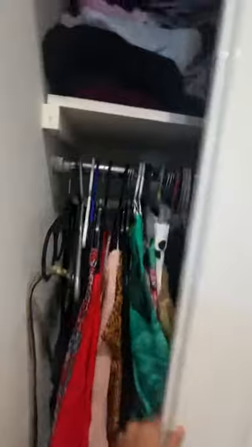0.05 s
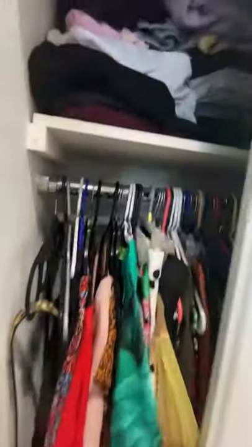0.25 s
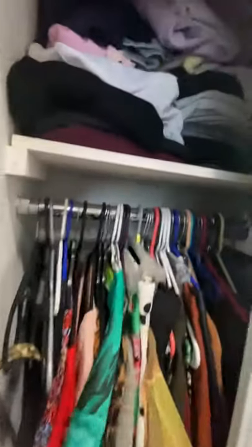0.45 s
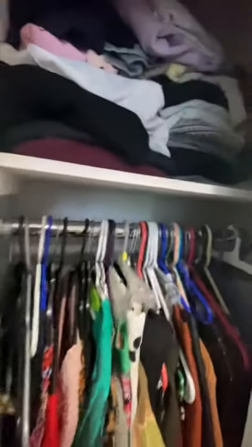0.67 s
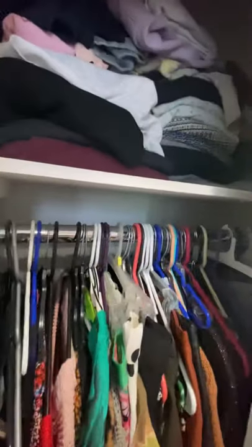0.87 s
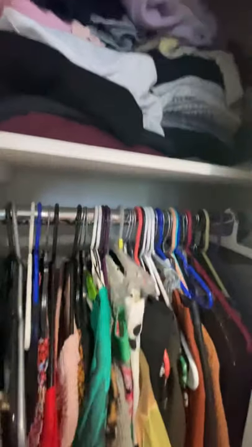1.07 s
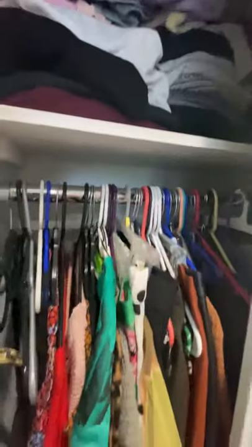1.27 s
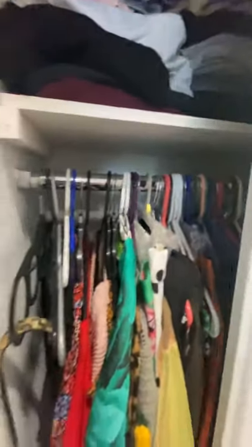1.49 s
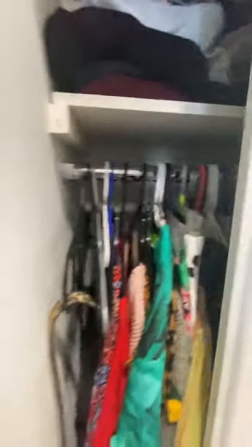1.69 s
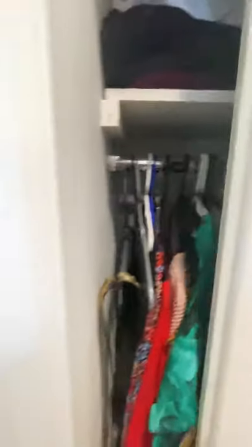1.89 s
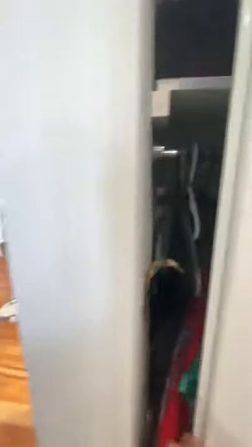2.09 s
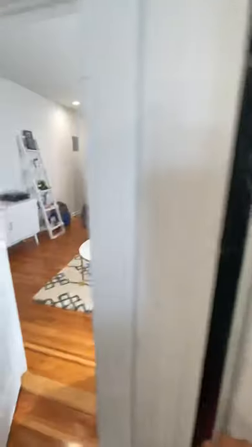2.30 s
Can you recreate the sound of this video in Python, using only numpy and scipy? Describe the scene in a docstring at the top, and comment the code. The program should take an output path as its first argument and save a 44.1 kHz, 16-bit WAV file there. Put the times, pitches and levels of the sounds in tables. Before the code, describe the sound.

Close up in a small, quiet room, a closet door knocks and chatters open by hand. After a brief lull with light plastic taps, it is pulled shut, rolling unevenly and bumping against its frame.

```python
"""A soft wooden knock and a low rub, close to a microphone pair in a small room: a light closet door
is pushed open and pulled shut by hand. It rolls unevenly, and its guide sticks and slips, chattering
along the metal track. Each knock against the frame cracks, rings the wood and track, and sets the
panel booming. Midway come a few light plastic taps, as of hangers; quiet room air lies under it all."""
import sys
import numpy as np
from scipy import signal
from scipy.fft import rfft, irfft, next_fast_len
from scipy.io import wavfile
from scipy.ndimage import uniform_filter1d

SR = 44100
rng = np.random.default_rng(int(sys.argv[2]) if len(sys.argv) > 2 else 0)


def materialize(psi):
    """Save the field psi as 16-bit PCM at rate SR to the path in sys.argv[1].

    A 1-D psi becomes a single channel; in a 2-D psi each row is a channel.
    """
    bounded = np.clip(np.atleast_2d(psi).T, -1, 1)
    quanta = np.round(bounded * 32767).astype(np.int16)
    wavfile.write(sys.argv[1], SR, quanta)


N = 108045


def amp(db):
    """Decibels to gain."""
    return 10 ** (np.asarray(db) / 20)


def unit(x):
    """Scales to rms 1."""
    return x / np.sqrt(np.mean(x ** 2) + 1e-20)


def fade(t, t60):
    """Falls 60 dB in t60 seconds."""
    return np.exp(-np.log(1000) * t / t60)


def curve_at(points, hz):
    """Interpolates a table on a log-frequency axis."""
    f, value = np.transpose(points)
    return np.interp(np.log(hz + 1), np.log(f + 1), value)


def add(mix, start, sound):
    """Mixes a sound in, start seconds from the beginning."""
    part = mix[:, max(round(start * SR), 0):][:, :sound.shape[1]]
    part += sound[:, :part.shape[1]]


def noise(spectrum, size, tilt=0):
    """Two unrelated noises of one spectrum at rms 1, tilted in dB per octave above about 1 kHz."""
    hz = np.fft.rfftfreq(size, 1 / SR)
    phase = np.exp(2j * np.pi * rng.random((2, len(hz))))
    db = curve_at(spectrum, hz) + tilt * np.log2(1 + hz / 1000)
    return unit(irfft(phase * amp(db), size))


def ring(modes, t, pitch=1):
    """Dying sines, slightly detuned at random, heard at two spots a quarter cycle apart."""
    detune = 1 + 0.003 * rng.standard_normal(len(modes))
    z = sum(amp(db) * fade(t, t60) * np.exp(2j * np.pi * hz * pitch * d * t)
            for (hz, db, t60), d in zip(modes, detune))
    return np.array([z.imag, z.real])


# The still room at the microphones. Each row: frequency in Hz, relative noise density in dB.
AIR_SPECTRUM = [(15, -12), (50, 6), (100, -17), (300, 1), (600, -18), (1200, -52), (2000, -18), (3200, -55),
                (4800, -27), (8000, -47), (12000, -37), (16000, -57)]

def room_air():
    """A steady, quiet rush of air in the background."""
    return amp(-61) * noise(AIR_SPECTRUM, N)


# The small room's decay. Each row: frequency in Hz, t60 in seconds.
ROOM_DECAY = [(60, 0.88), (250, 0.15), (700, 0.42), (2000, 0.48), (5000, 0.47), (12000, 0.27)]

def room(x, db):
    """The walls add a tail of sparse reflections, each band dying at its own speed."""
    echoes = rng.standard_normal((2, SR)) * (rng.random((2, SR)) < 4000 / SR)
    hz, t, z = signal.stft(echoes, SR, nperseg=256)
    tail = signal.istft(z * fade(t, curve_at(ROOM_DECAY, hz)[:, None]), SR, nperseg=256)[1]
    tail *= np.arange(tail.shape[1]) > 0.0064 * SR  # reflections begin after 6.4 ms
    return x + amp(db) * signal.fftconvolve(x, tail / np.linalg.norm(tail[0]), axes=1)[:, :N]


# The close pair. Each row: frequency in Hz, then in turn the left-right likeness from 0 to 1,
# the left's phase lead in radians, and left minus right in dB.
MIC_LIKENESS = [(100, .997), (200, .98), (380, .93), (560, .55), (750, .4), (1100, .65), (1600, .75),
                (3200, .62), (6000, .68), (7200, .92), (8600, .72), (10000, .98), (15000, .92)]
MIC_LEAD = [(100, 0), (380, -.15), (520, -.6), (680, -1.3), (820, -1.9), (950, -3.3), (1120, -5),
            (1800, -6), (2600, -4.4), (3900, -5.5), (6000, -5.6), (7000, -3.3), (7800, -3), (9700, -.1),
            (11500, .1), (12600, 3), (14500, 3.2), (15500, 6.1)]
MIC_BALANCE = [(50, 1.5), (170, -3), (330, -4), (550, -1.5), (800, 1), (1150, -0.5), (1900, 1.5),
               (2700, -1.5), (5500, -0.5), (9000, -0.5)]

def mic_pair(x):
    """The two microphones hear a sound partly alike, shifted in phase and a little unequal."""
    size = next_fast_len(x.shape[1] + SR // 4)
    shared, apart = rfft(x, size)
    hz = np.fft.rfftfreq(size, 1 / SR)
    alike = np.clip(curve_at(MIC_LIKENESS, hz), 0, 1)
    side = amp(curve_at(MIC_BALANCE, hz) / 2)
    left = (alike * shared + np.sqrt(1 - alike ** 2) * apart) * np.exp(1j * curve_at(MIC_LEAD, hz))
    return irfft(np.array([left * side, shared / side]), size)[:, :x.shape[1]]


def patchy(x, depth_db=2, patch_s=0.07, patch_hz=350):
    """Narrow bands swell and sink at random as the rubbing spot changes."""
    hz, t, z = signal.stft(x, SR, nperseg=512)
    swell = uniform_filter1d(rng.standard_normal(z.shape[1:]), round(patch_s / t[1]), axis=1)
    swell = unit(uniform_filter1d(swell, round(patch_hz / hz[1]), axis=0))
    return unit(signal.istft(z * amp(depth_db * swell), SR, nperseg=512)[1][:, :x.shape[1]])


# The door moving by the microphones. Each row: time in seconds, then rub, roll and rumble in dB.
TRAVEL_LEVELS = [(0, -50.5, -44, -40), (0.102, -57.5, -47, -46), (.2, -47, -43, -44.5),
                 (.42, -66, -37.5, -31), (.55, -58.5, -53.5, -39), (.68, -62, -56, -44.5),
                 (0.802, -64.5, -61.5, -47.5), (.86, -71.5, -52.5, -46.5), (.92, -76.5, -56.5, -52.5),
                 (1.06, -65, -53, -46), (1.16, -57.5, -57.5, -52.5), (1.3, -56.5, -54, -47),
                 (1.44, -58.5, -49.5, -49), (1.6, -60.5, -48.5, -35), (1.73, -56, -44.5, -45),
                 (1.88, -59.5, -48.5, -51), (2.0, -54, -40.5, -39.5), (2.2, -59.5, -45, -36.5),
                 (2.359, -59, -61, -43.5), (2.45, -59.5, -46, -43)]
# Those three noises. Each row: frequency in Hz, relative density in dB.
RUB_SPECTRUM = [(100, 1), (700, 10.5), (1200, -6), (1700, 4), (2800, 4), (3800, -3), (5300, 0.5),
                (7500, -5.5), (12000, -13.5), (13000, -10), (16000, -31)]
ROLL_SPECTRUM = [(25, 5.5), (70, -6), (120, 2.5), (200, -3.5), (420, -9.5), (650, -18.5), (1100, -18.5),
                 (3000, -81), (9000, -101)]
RUMBLE_SPECTRUM = [(15, -31), (30, 3), (42, 3.5), (50, 7.5), (62, 4), (85, -11.5), (150, -27), (500, -95)]
# The metal track, rubbed or knocked. Each row: Hz before pitch scaling, level in dB, t60 in seconds.
TRACK_MODES = [(1560, -35, 0.11), (1680, -18.5, 0.1), (2070, -30, 0.11), (2120, -30, 0.13),
               (2286, -23.5, 0.22), (2778, -26.5, 0.255), (3027, -20.5, 0.16), (4333, -23.5, 0.15),
               (5430, -31, 0.11), (5620, -24, 0.17)]

def travel():
    """The moving door rubs along the ringing track, rolls unevenly and shakes its panel."""
    times, *levels = np.transpose(TRAVEL_LEVELS)
    rub_db, roll_db, rumble_db = [np.interp(np.arange(N) / SR, times, db) for db in levels]
    flutter_db = 2 * unit(uniform_filter1d(rng.standard_normal(N), size=700))
    t = np.arange(SR // 4) / SR
    friction = noise(RUB_SPECTRUM, N)
    damped_track = ring(TRACK_MODES, t, pitch=0.91) * fade(t, t60=0.59)
    singing = unit(signal.fftconvolve(friction, damped_track, axes=1)[:, :N])
    rub = amp(rub_db + flutter_db / 2) * patchy(friction + amp(-9.5) * singing)
    roll = amp(roll_db + flutter_db) * noise(ROLL_SPECTRUM, N)
    return rub + roll + amp(rumble_db) * noise(RUMBLE_SPECTRUM, N)


# Light taps at the closet. Each row: start in seconds, then click, body and edge gains in dB.
PLASTIC_TAPS = [(0.569, -53.5, -70, -50), (0.9835, -41, -43, -45.5), (0.995, -56, -43, -70),
                (1.047, -55.5, -59, -66)]
# Those three parts as noise. Each row: frequency in Hz, relative density in dB.
CLICK_SPECTRUM = [(250, -35), (600, 3.5), (1500, -4), (2100, 3), (2900, 0), (3800, -14.5), (6500, -16.5),
                  (13000, -44)]
BODY_SPECTRUM = [(150, -31), (330, -13), (420, 1), (620, -7), (760, -4.5), (1050, -8.5), (1600, -52),
                 (3500, -27), (9000, -49)]
EDGE_SPECTRUM = [(2000, -20), (6000, -17), (7300, 3), (8500, 0.5), (10300, -6), (12000, -19.5),
                 (15000, -21.5)]
# The body's ring. Each row: frequency in Hz, level in dB, t60 in seconds.
PLASTIC_MODES = [(350, -8.5, 0.17), (415, 1.5, 0.18), (592, -6.5, 0.28), (910, -4, 0.28), (1078, 1, 0.21),
                 (1443, -4.5, 0.14), (2060, -3.5, 0.087), (2760, -12, 0.067), (3190, -18, .1)]
CONTACT_RISE_S = 0.00093

def plastic_taps():
    """Tapped plastic gives a dry click, a thin bright edge and a hollow body that dies more slowly."""
    t, out = np.arange(SR // 2) / SR, np.zeros((2, N))
    for start, click_db, body_db, edge_db in PLASTIC_TAPS:
        click = amp(click_db) * noise(CLICK_SPECTRUM, len(t)) * fade(t, t60=0.09)
        hollow = amp(-2) * noise(BODY_SPECTRUM, len(t)) * fade(t, t60=0.23)
        body = amp(body_db) * (hollow + amp(-3) * ring(PLASTIC_MODES, t))
        edge = amp(edge_db) * noise(EDGE_SPECTRUM, len(t)) * fade(t, t60=0.048)
        add(out, start, (click + body + edge) * np.minimum(t / CONTACT_RISE_S, 1))
    return room(out, db=-13.5)


# The guide catching in the track, heard close. Each row: start and length in seconds, chatter in dB,
# its tilt in dB per octave, judder of the wood in dB.
GUIDE_SCRAPES = [(0.171, 0.066, -48, 4, -39.5), (0.269, 0.075, -38.5, 4.5, -60),
                 (1.507, 0.0955, -39, 0.5, -45.5), (1.763, 0.063, -41.5, 5, -46.5),
                 (2.21, 0.077, -62.5, 13, -56.5), (2.322, 0.07, -47, 3, -45)]
# The track's chatter and the wood's judder. Each row: frequency in Hz, relative density in dB.
CHATTER_SPECTRUM = [(60, 35.5), (400, 25), (900, -3), (1500, -6), (2400, 7), (3800, 1), (5600, 2.5),
                    (7500, -3.5), (11800, -12.5), (13000, -25), (16000, -60.5)]
JUDDER_SPECTRUM = [(60, 1.5), (150, -13), (240, 1), (320, -14), (420, 4), (600, -35.5), (820, 3.5),
                   (1100, -16), (2000, -25), (6000, -59.5)]

def scrapes(slips_per_s=1100, spread_db=2, rise_s=0.0036, fall_s=0.017):
    """The guide sticks and slips: each tiny slip ticks against the track and shakes the wood."""
    t, out = np.arange(SR // 4) / SR, np.zeros((2, N))
    size = 2048  # samples in one tick
    for start, length, chatter_db, tilt, judder_db in GUIDE_SCRAPES:
        slipping = rng.random(len(t)) < slips_per_s / SR
        slips = slipping * amp(-spread_db * rng.standard_normal(len(t))) * rng.choice([-1, 1], len(t))
        tick = amp(chatter_db) * unit(noise(CHATTER_SPECTRUM, size, tilt) * fade(t[:size], t60=0.013))
        judder = amp(judder_db) * unit(noise(JUDDER_SPECTRUM, size) * fade(t[:size], t60=0.12))
        run = signal.fftconvolve(unit(slips)[None], (tick + judder) / np.sqrt(size), axes=1)
        envelope = np.clip(np.minimum(t / rise_s, (length - t) / fall_s), 0, 1)
        add(out, start, run[:, :len(t)] * envelope)
    return room(out, db=-7.5)


# The door hitting its frame, close to the pair. Each row: start in seconds; crack, wood and boom in dB;
# crack tilt in dB per octave; wood pitch as a ratio; crack t60 in seconds; then the clack's
# pitch in Hz, level in dB and left minus right in dB.
FRAME_KNOCKS = [(0.001, -49, -37.5, -48, -20, 0.86, 0.059, 770, -44, -4),
                (0.1714, -41.5, -53, -71, -3, 1.06, 0.044, 815, -38, -9),
                (0.190, -41.5, -49, -52, -14, 0.8, 0.056, 843, -41.5, -17),
                (0.248, -37, -63, -62, 1, 1.3, 0.058, 820, -36.5, -10),
                (0.2543, -14, -21, -22.5, 1.5, 1.0, 0.027, 778, -23.5, -22.5),
                (0.2688, -29.5, -27.5, -23.5, 16.5, 1.0, 0.044, 415, -27.5, -1),
                (0.3455, -28, -30.5, -22.5, -1, 1.03, 0.11, 1900, -35, -2),
                (0.905, -84, -77, -47, -4, 0.36, 0.037, 166.4, -47.5, 3),
                (1.5089, -55, -43.5, -46, 4, 0.85, 0.032, 330, -57, 0),
                (1.5517, -29.5, -38, -36, 2, 1.095, 0.033, 1860, -36.5, -13),
                (1.559, -39, -33.5, -33, -13, .63, 0.057, 239, -30.5, -2),
                (1.7610, -32, -32, -30, -4, 0.7, 0.031, 2395, -29.5, -4),
                (1.784, -48, -33.5, -31.5, 21, 0.94, 0.033, 177, -29.5, 1),
                (1.801, -49, -39, -46, 3, 0.89, .03, 409, -32, 1),
                (1.822, -52, -40.5, -42, 4, 0.73, 0.033, 246, -36.5, -8),
                (1.884, -75, -64, -51, 0, .7, 0.024, 126, -41, 1),
                (1.9196, -40.5, -59, -49, 2.5, 2.7, 0.056, 2460, -58, 0),
                (2.0293, -27.5, -31, -29, -3, 0.74, 0.047, 241, -25, -0.5),
                (2.0332, -37, -38.5, -56, 4, 1.55, 0.031, 730, -41, -7),
                (2.122, -67, -46.5, -35, 6, 0.5, 0.032, 215, -41.5, 2),
                (2.268, -38.5, -72, -55, -1, 3.6, 0.016, 581, -46, 17),
                (2.2951, -41.5, -40.5, -56, -3.5, 0.98, 0.084, 877, -33, 3),
                (2.357, -44, -48.5, -48, 6, 0.98, 0.036, 264, -35, -2)]
# Contact and wood noise. Each row: Hz before any pitch scaling, relative density in dB.
CRACK_SPECTRUM = [(100, -14), (420, -24), (620, -6), (800, -0.5), (1000, 7), (1300, 2.5), (1650, 1.5),
                  (2300, 4), (3600, -3.5), (5600, -4.5), (7500, -17), (11000, -17.5), (12300, -24.5),
                  (13200, -27), (16000, -45)]
CLUNK_SPECTRUM = [(30, -43), (90, -18), (150, -1), (270, 1), (450, 5.5), (530, -5), (650, -9),
                  (1000, -10.5), (2000, -17), (6000, -37.5)]
# The wood and panel ringing. Each row: Hz before pitch scaling, level in dB, t60 in seconds.
WOOD_MODES = [(214.3, -18.5, 0.7), (300, -3.5, 0.14), (393.8, -10.5, 0.38), (458.4, 0.5, 0.12),
              (541, -15, 0.26), (771, -16.5, 0.26), (930, -25.5, 0.16), (973, -14, 0.19)]
PANEL_MODES = [(48.9, -3, 0.66), (63.2, -10, 0.45), (90, -14.5, 0.78), (115.05, -4.5, 0.58),
               (125, -2, 0.28), (147.3, -14, 0.6), (179.1, -5.5, 0.27)]

def knocks(wood_rise_s=0.0084, panel_rise_s=0.011):
    """Each blow cracks at the contact, rings the track, clunks the wood and sets the panel booming."""
    t = np.arange(SR) / SR
    cracks, rings, booms = np.zeros((3, 2, N))
    for start, crack_db, wood_db, boom_db, tilt, pitch, crack_t60, *_ in FRAME_KNOCKS:
        crack = noise(CRACK_SPECTRUM, SR, tilt) * fade(t, crack_t60)
        add(cracks, start, amp(crack_db) * crack * np.minimum(t / CONTACT_RISE_S, 1))
        add(rings, start, amp(crack_db) * ring(TRACK_MODES, t[:SR // 2], pitch=0.95))
        clunk = amp(1) * noise([(hz * pitch, db) for hz, db in CLUNK_SPECTRUM], SR) * fade(t, t60=0.14)
        wood = clunk + ring(WOOD_MODES, t, pitch)
        add(rings, start, amp(wood_db) * wood * np.minimum(t / wood_rise_s, 1))
        boom = ring(PANEL_MODES, t, pitch=0.98)
        add(booms, start, amp(boom_db) * boom * np.minimum(t / panel_rise_s, 1))
    return room(cracks, db=-9.5) + room(rings, db=-7.5) + booms


# The struck spot, close and dry. Each row: ratio to the clack's pitch, level in dB, t60 in seconds.
CLACK_MODES = [(0.9, -13, 0.02), (1.0, -1.5, 0.065), (1.11, -2, 0.036), (1.28, -7.5, 0.046)]

def clacks(rise_s=0.0015):
    """The struck spot of each knock rings briefly in a tight cluster of modes, from its own side."""
    t, out = np.arange(SR // 5) / SR, np.zeros((2, N))
    for start, *_, clack_hz, clack_db, pan_db in FRAME_KNOCKS:
        clack = ring(CLACK_MODES, t, clack_hz) * np.minimum(t / rise_s, 1)
        gains = amp(clack_db + np.array([[pan_db], [-pan_db]]) / 2)
        add(out, start, gains * mic_pair(clack))
    return out


def scene():
    """The door over quiet room air, as the close pair picks it up."""
    return mic_pair(knocks() + plastic_taps() + scrapes() + travel() + room_air()) + clacks()


def record(dry, low_cut_hz=41.5, top_fade_hz=14300, band_limit_hz=15900):
    """The deepest bass and the top treble are filtered away; a steep band limit follows."""
    low_cut = signal.butter(4, low_cut_hz, "highpass", fs=SR, output="sos")
    top_fade = signal.butter(8, top_fade_hz, fs=SR, output="sos")
    band_limit = signal.firwin(255, band_limit_hz, window=("kaiser", 9), fs=SR)
    heard = signal.sosfilt(np.vstack([low_cut, top_fade]), dry)
    return signal.oaconvolve(heard, band_limit[None], "same")


dry = scene()
out = record(dry)
materialize(out)
```